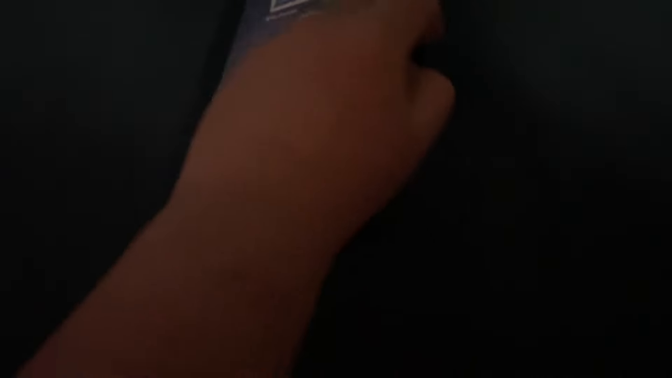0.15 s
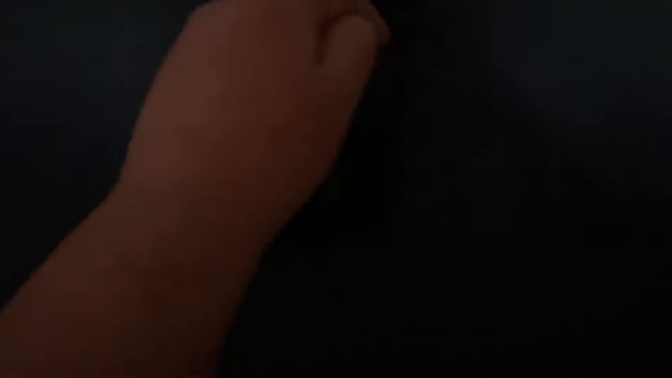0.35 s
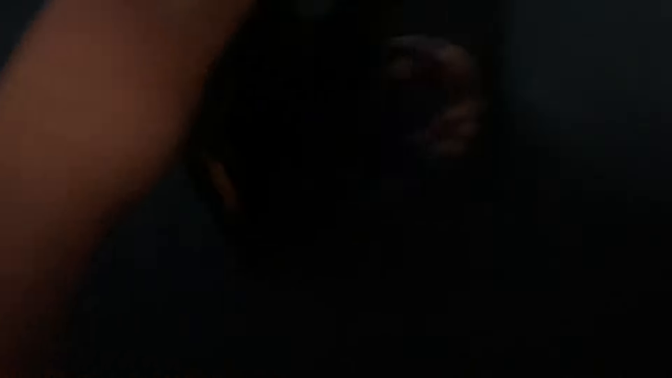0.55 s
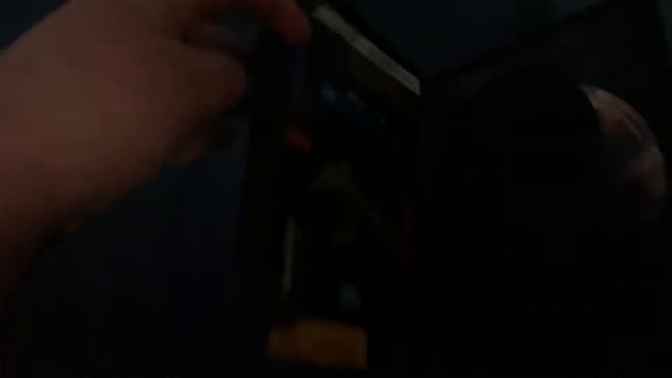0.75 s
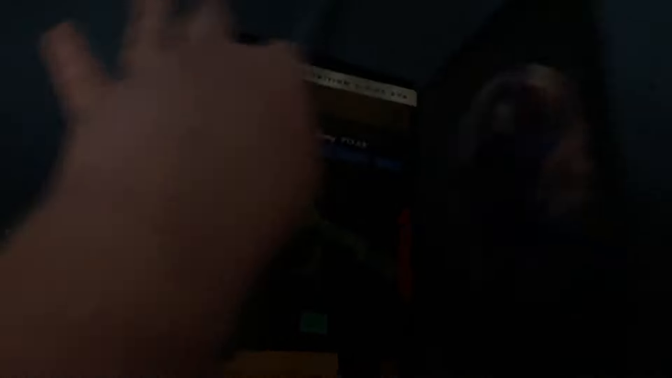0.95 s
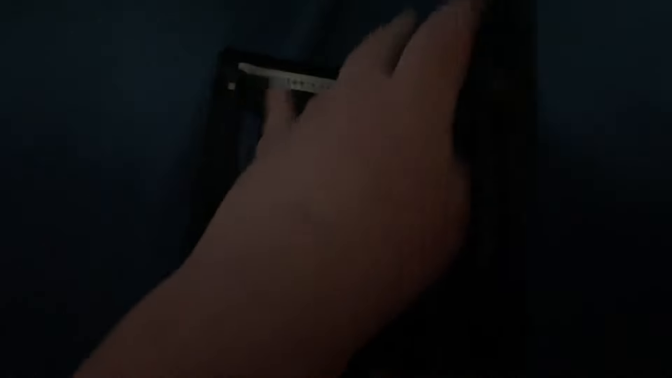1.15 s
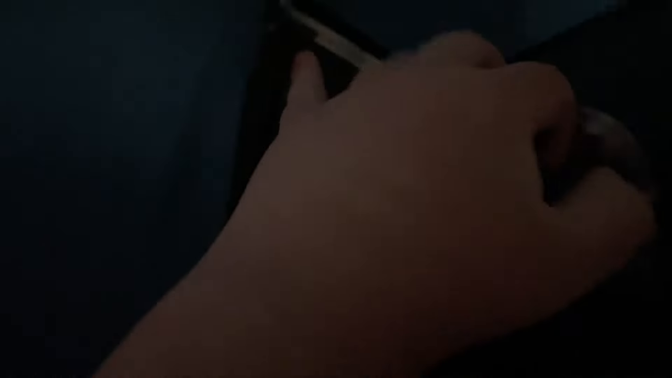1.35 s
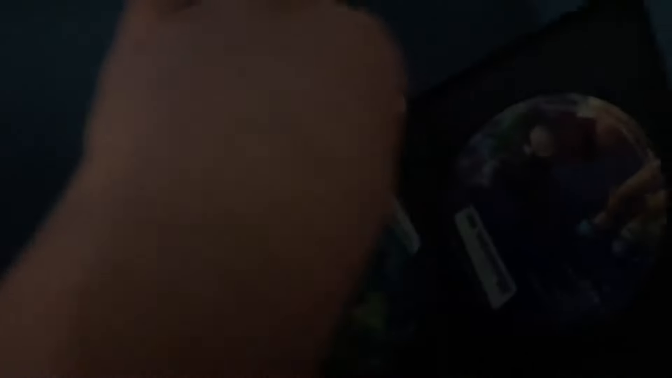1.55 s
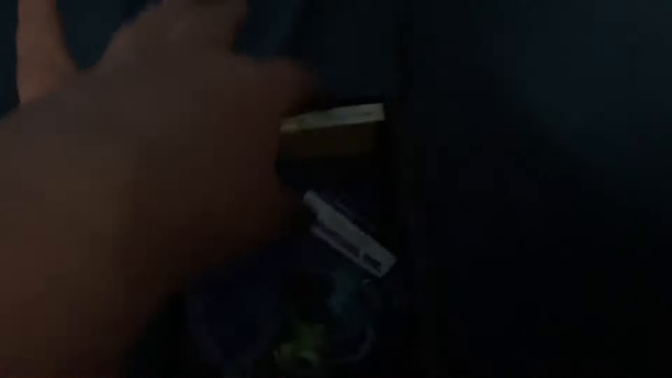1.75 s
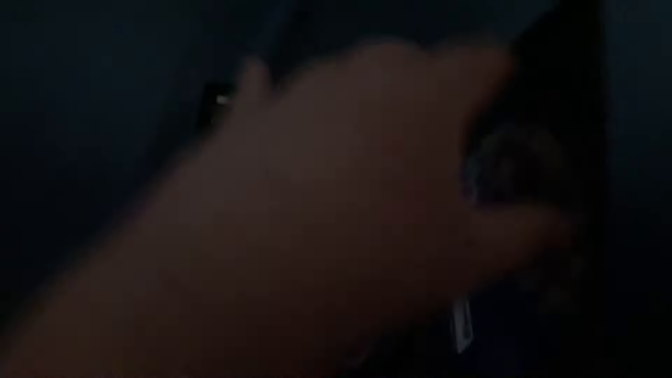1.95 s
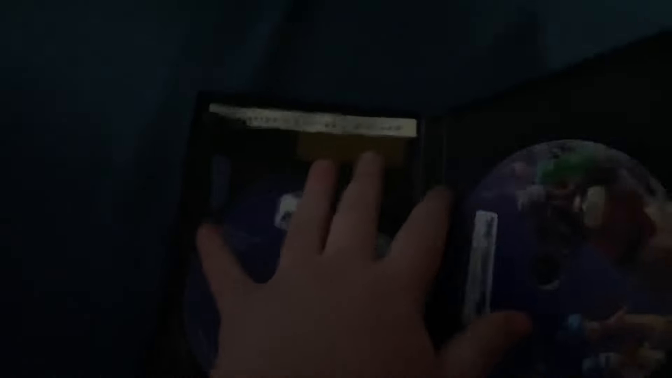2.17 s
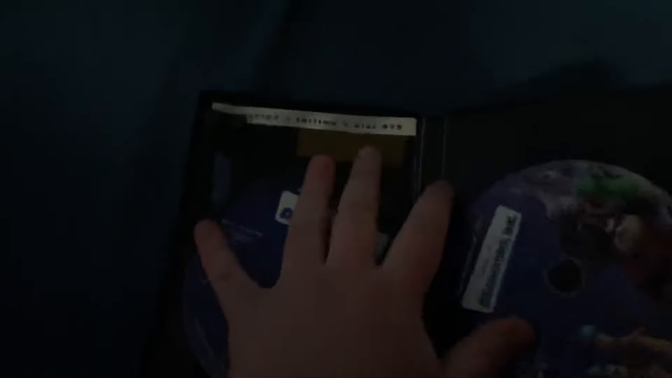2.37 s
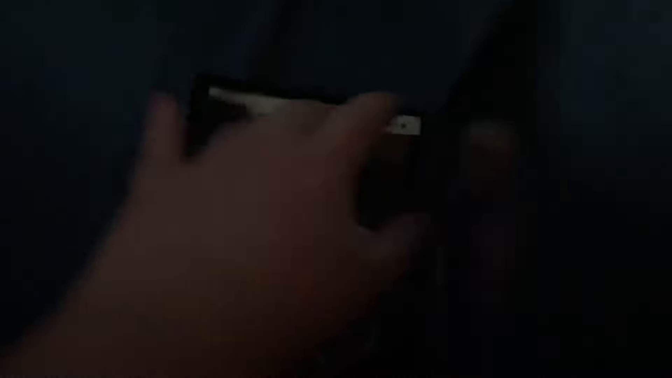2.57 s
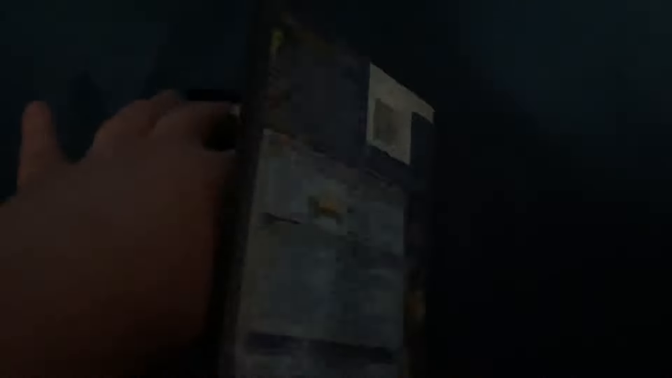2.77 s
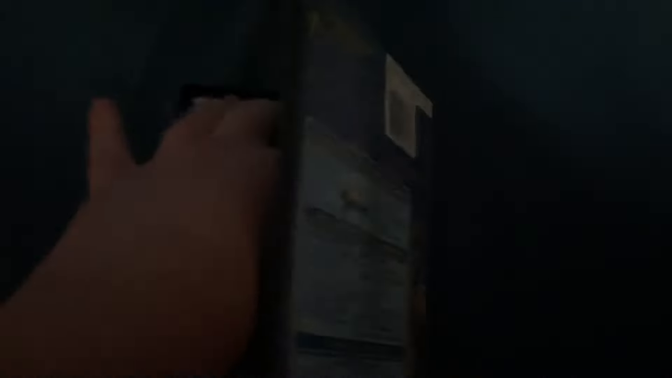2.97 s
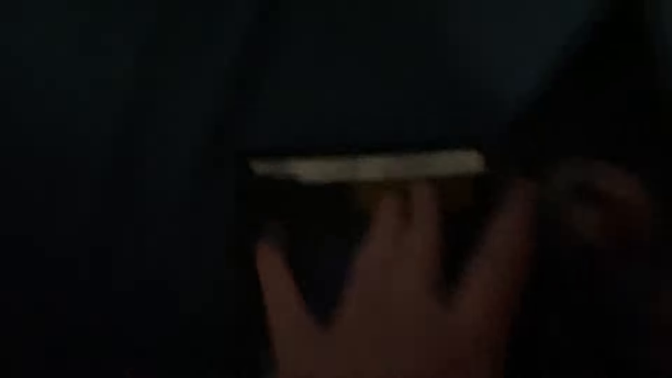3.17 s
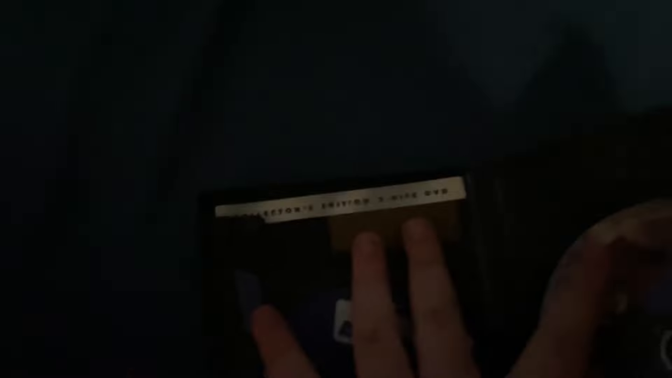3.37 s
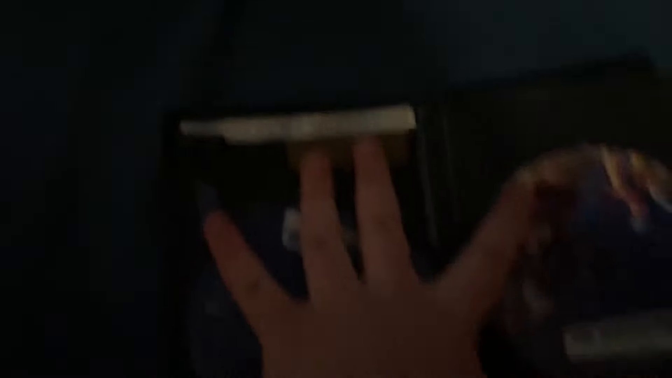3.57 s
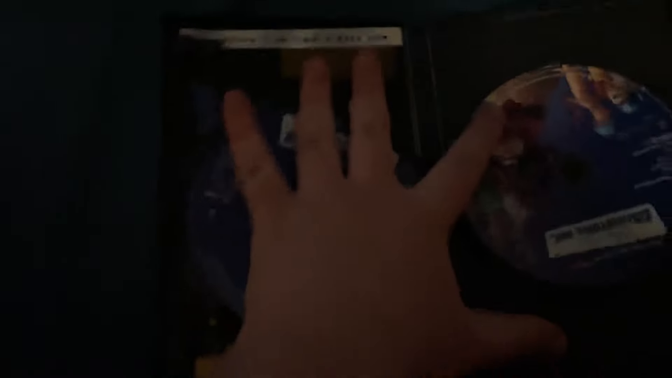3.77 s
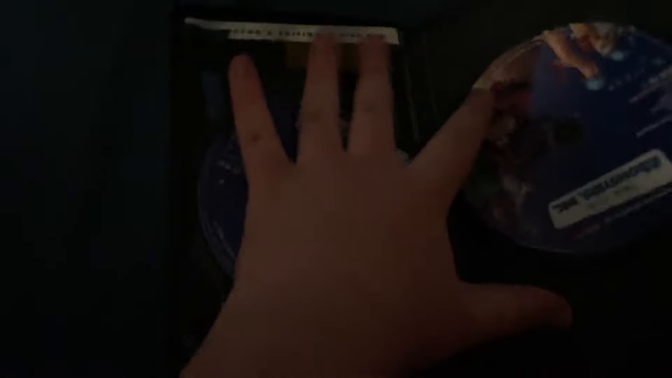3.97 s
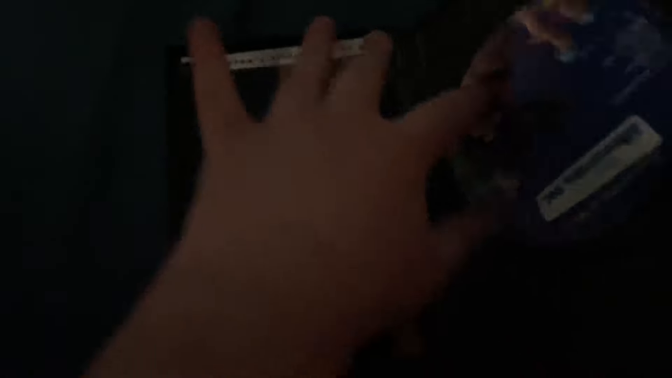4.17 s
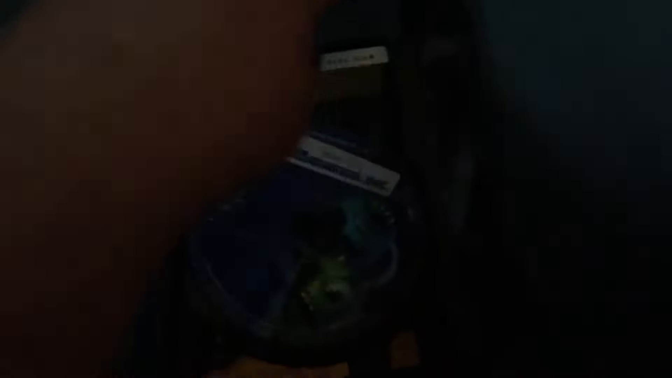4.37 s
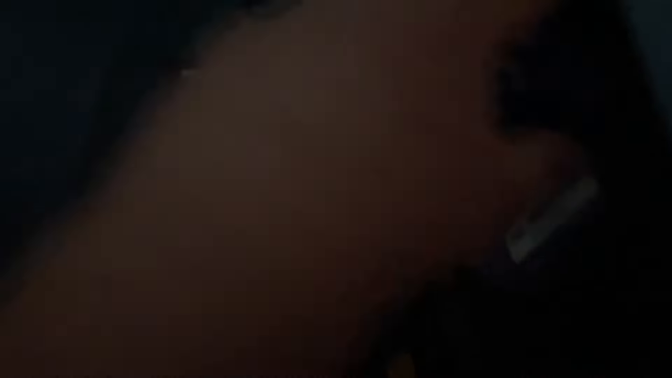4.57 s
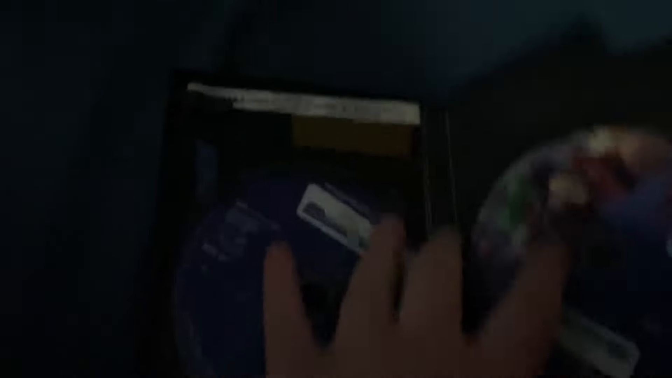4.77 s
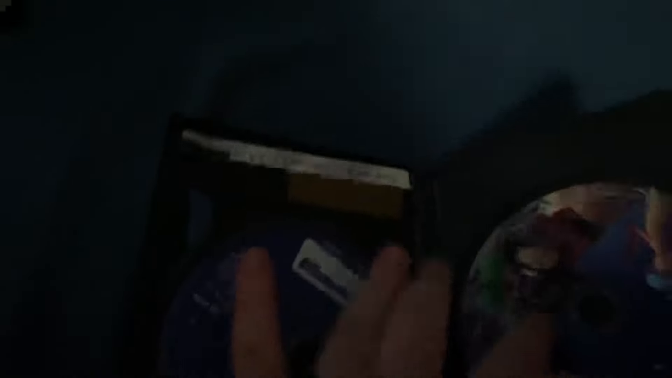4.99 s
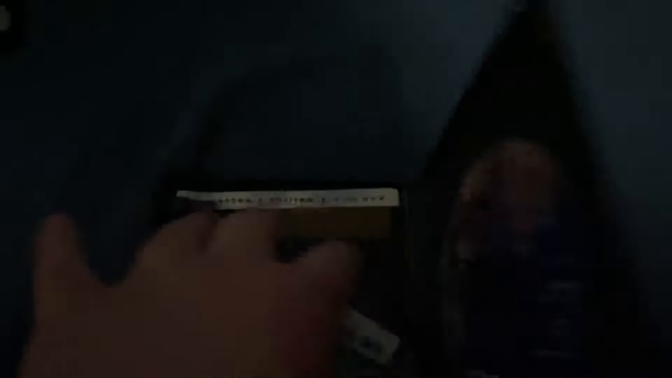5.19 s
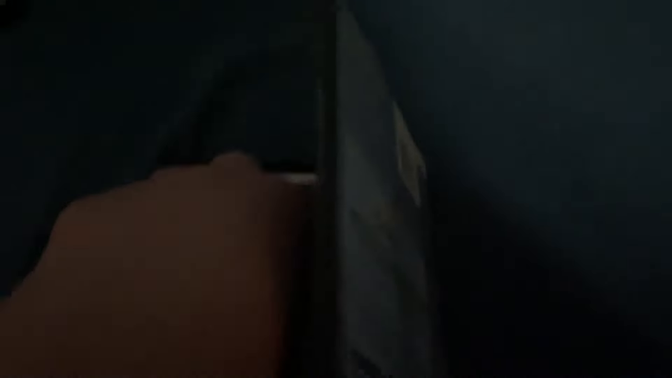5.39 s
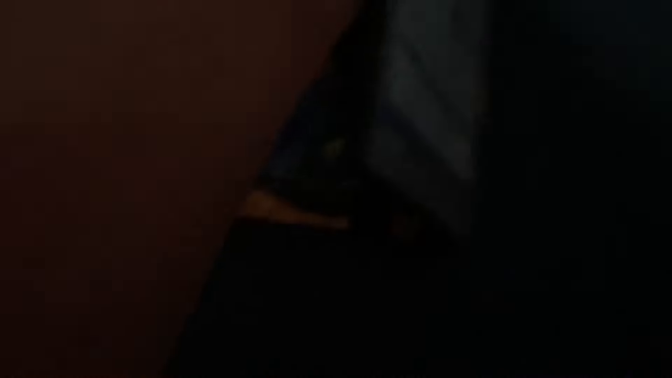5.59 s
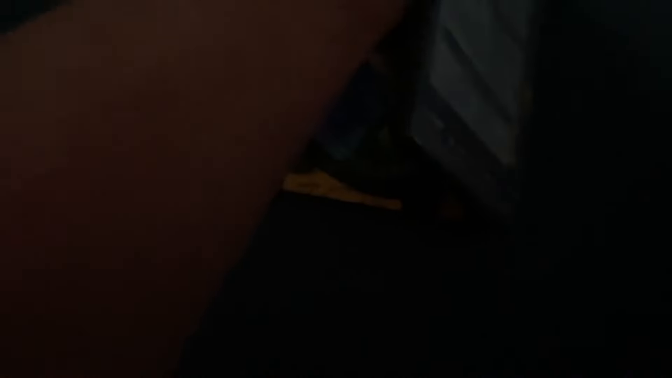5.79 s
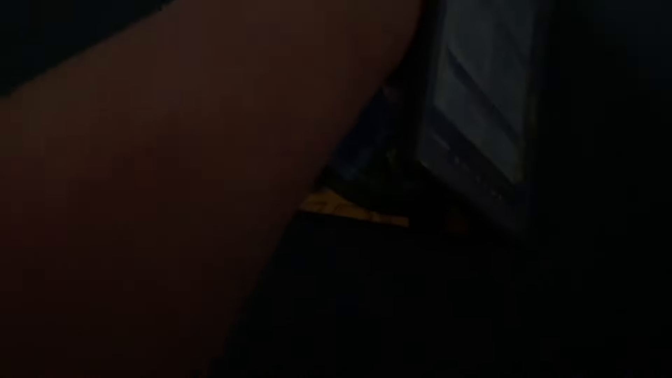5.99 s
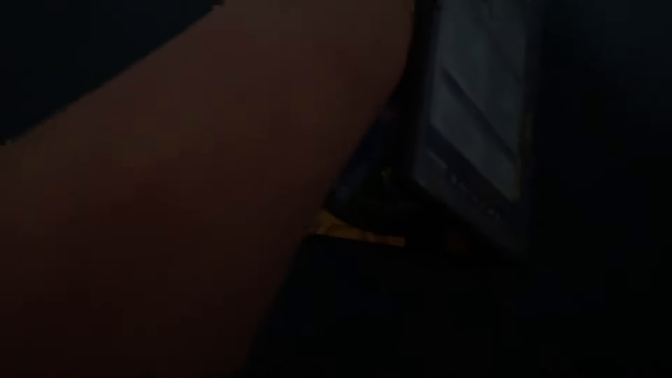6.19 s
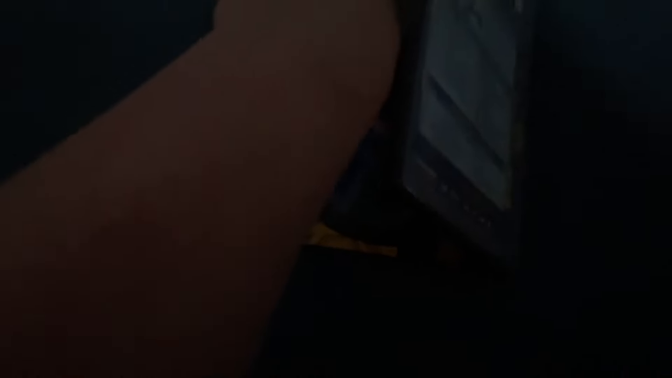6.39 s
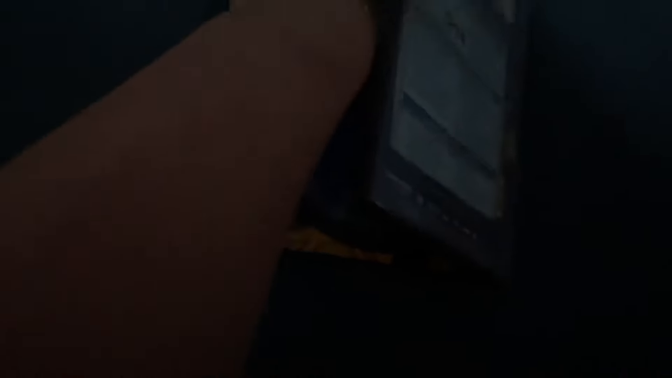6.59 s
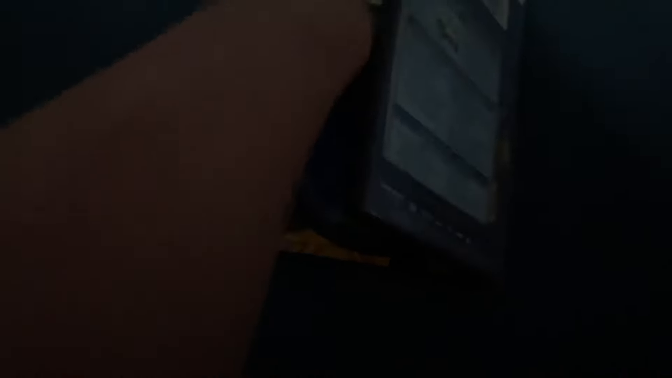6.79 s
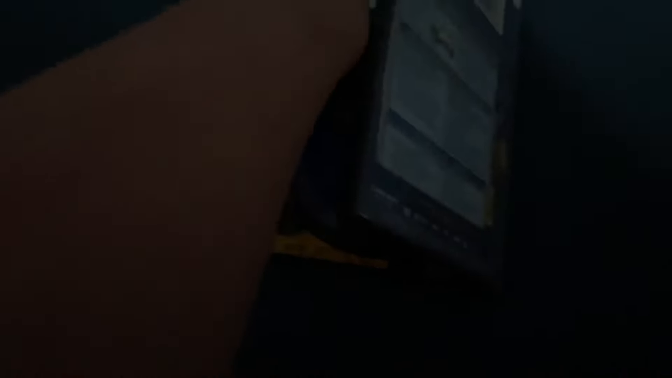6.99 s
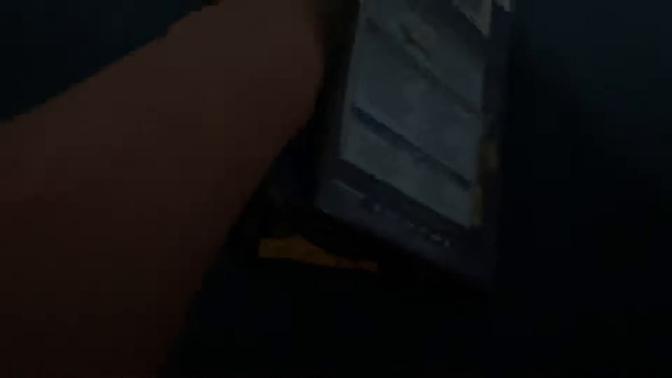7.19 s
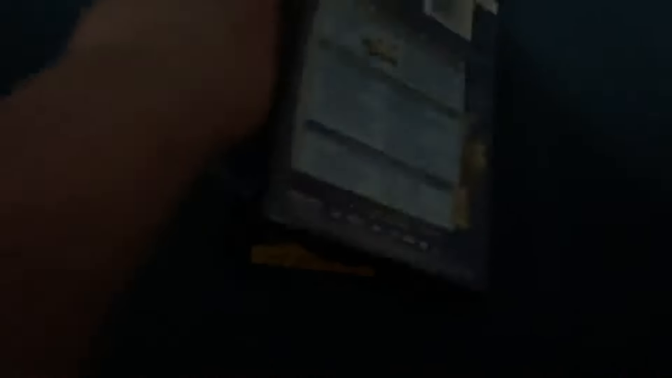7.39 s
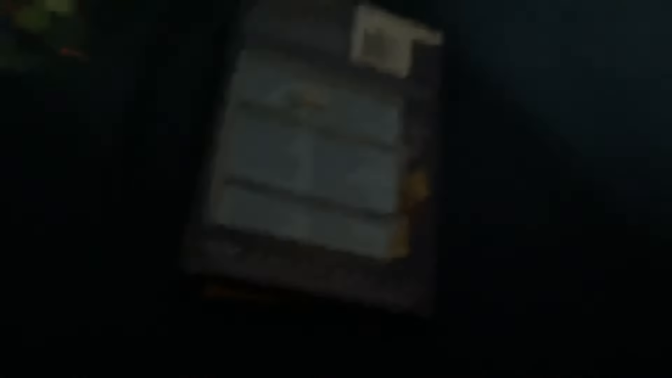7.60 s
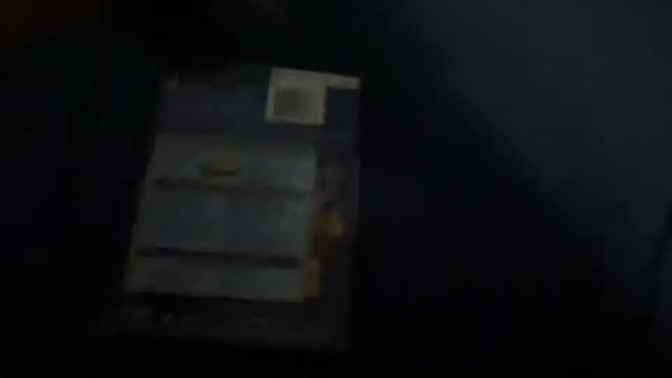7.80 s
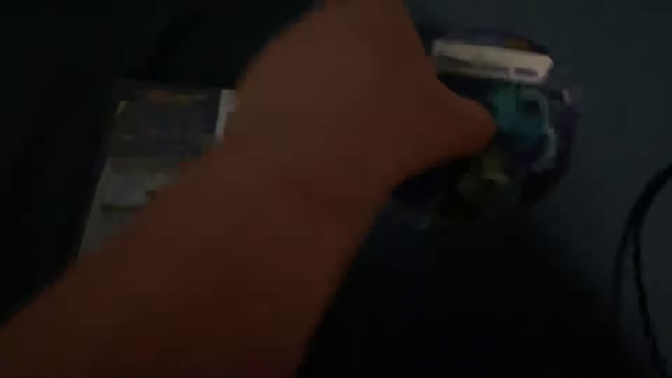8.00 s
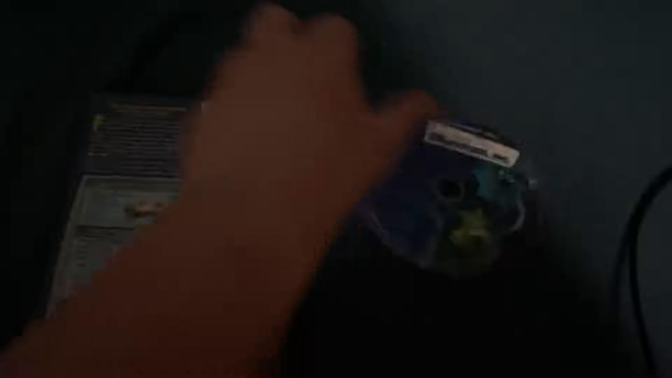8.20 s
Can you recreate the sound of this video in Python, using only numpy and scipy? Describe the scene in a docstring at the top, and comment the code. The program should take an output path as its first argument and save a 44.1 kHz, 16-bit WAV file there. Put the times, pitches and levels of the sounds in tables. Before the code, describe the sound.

Brittle plastic catches crack and loose leaves buzz as a disc case is opened and turned over by hand. Skin and sleeve brush it, plastic scrapes in short strokes, and the case rustles and thuds dully on padding. Activity is dense for the first half, sparser later, until a hard snap frees the disc and soft bumps finish. The microphone is close, the room small and dry, with faint hiss and a thin high-pitched electronic whine.

```python
"""Opening a disc case

A hand opens a plastic disc case on a padded surface, flips its leaves and pops a disc off the hub.
Catches snap and loose plastic ticks: noise bursts excite the resonances of a thin shell.
Sliding plastic scrapes as modulated noise; soft bumps on the padding are short tones of falling pitch.
Skin and sleeve brush the case and the case drags on the padding, both as shaped noise.
The room is small and dry, with a faint hiss and the thin whine of a picture tube."""
import sys
import numpy as np
from scipy import signal
from scipy.fft import rfft, irfft, next_fast_len
from scipy.io import wavfile
from scipy.ndimage import uniform_filter1d

SR = 44100
rng = np.random.default_rng(int(sys.argv[2]) if len(sys.argv) > 2 else 0)


def store_wav(level_fs):
    """Save 16-bit WAV to argv[1]."""
    pcm = np.round(np.clip(np.atleast_2d(level_fs), -1, 1) * 32767)
    wavfile.write(sys.argv[1], SR, pcm.T.astype(np.int16))


N = 363825  # samples

# plastic striking plastic: t/s, build-up/s, presence-band level over 10 ms before the trim/dB,
# then knock/dB, hollow/dB and edge/dB relative to presence, ring f/Hz, left-right difference/dB
CLICKS = [(0.0424, 0.00075, -41.5, -26, 3, -3, 900, 1.5), (0.337, 0.00092, -30.5, 3, 1.5, -1, 4260, 7),
          (0.341, 0.00092, -17.5, -3, -2.5, -11, 1870, -3), (0.5951, 0.001, -45, -11, -6, 4.5, 5230, 5),
          (0.749, 0.0015, -49.5, 6, -11, -18, 1750, 0), (0.779, 0.0015, -41, -27, -4, -7, 4100, 4),
          (0.8293, 0.00066, -53.5, 0, 0, -6, 1420, -3), (1.0105, 0.0025, -25.5, -9.5, -3, -3.5, 1300, 3),
          (1.03, .0029, -46.5, 5, -4, -13, 3700, 11), (1.0529, .0017, -15.5, -14, -8, -2.5, 2540, 2),
          (1.257, 0.0017, -49, -12, -9, -12, 1640, 6), (1.4557, 0.0039, -41.5, -13, -0.5, -5.5, 1750, 0),
          (1.5902, 0.0016, -50, -26.5, -5, -5.5, 3020, 3.5), (1.7968, 0.0019, -45, 13, 3, 1, 694, 4.5),
          (1.81, 0.00076, -37.5, -1, -13, 3, 3200, -6.5), (1.8196, 0.00085, -40, -2, -6, 3, 736, 14),
          (1.8291, 0.0037, -33.5, -3, -1.5, -2.5, 740, -1), (1.8516, 0.002, -42, -1, -4, -2, 2700, 9),
          (1.983, 0.0011, -38, -12, -8, 0.5, 5370, 2.5), (2.0187, .002, -50.5, -3, -4, -30, 3360, 7),
          (2.0878, 0.0021, -44, -9, -3.5, -11, 3090, 6), (2.095, 0.003, -43.5, 0, -7, -8.5, 3270, 5),
          (2.2097, 0.0026, -37, -12.5, -14.5, -11.5, 3430, 0.5), (2.3364, .004, -66, 13, 14, -1, 710, 1),
          (2.4326, 0.0078, -48, -4, -1.5, -12.5, 2290, 1.5), (2.484, 0.0011, -53, -19, -1.5, -16, 920, 2),
          (2.6587, 0.0024, -61, 18, -5, 9, 3570, 5), (2.6691, 0.00083, -57, 1, 8.5, 5, 1060, 4),
          (3.0089, 0.0011, -34, -7, -4.5, -1, 4060, 1.5), (3.261, 0.0013, -49.5, 3, 0, -20, 3200, 5),
          (3.3223, 0.00074, -29.5, -5, -1, -1, 3200, 4), (3.468, 0.00081, -28.5, -14, -0.5, -6, 1020, -0.5),
          (3.4883, 0.0011, -52.5, 9, 5, -16, 3050, 1), (3.5454, 0.0004, -39.5, -6, -11.5, -2, 2620, -0.5),
          (3.888, .001, -53.5, -18, -10, -2, 4000, -3.5), (3.9324, 0.0013, -59.5, -16, -3, -7.5, 3060, 8.5),
          (4.1579, 0.0018, -43, -11, -10, -19, 3240, 7.5), (4.2823, .0017, -68, -0.5, 8.5, -13, 740, 11),
          (4.376, .0006, -65.5, 7.5, -5, 2.5, 4180, 7.5),
          (4.6278, 0.0029, -35.5, -17.5, -12, -7, 3220, 1.5),
          (4.7429, 0.0025, -40.5, -14, -32, -3, 3100, 1.5), (4.8323, .0026, -51, -25, -5.5, -10, 1960, 0.5),
          (5.1494, 0.00072, -55.5, -13, -4.5, -3.5, 2490, 10), (5.2791, 0.0017, -48, -2, -8, -7.5, 3570, 6),
          (5.4773, 0.0033, -44, -5, -9, -4, 3180, 3), (6.633, 0.0012, -57, 4.5, -3, -8, 2820, 1),
          (6.6981, 0.00098, -39.5, -2, -8.5, -5.5, 2480, 4.5),
          (6.8838, 0.0014, -21.5, -5.5, -10, 1.5, 2880, 0),
          (6.8867, 0.0013, -19.5, -5, -14, -0.5, 2280, 2.5), (7.166, 0.0025, -68.5, 2.5, -4, 1, 1190, 2),
          (7.2271, 0.0019, -46.5, 2.5, -19, -11.5, 2280, 4.5),
          (7.4914, 0.00059, -49.5, -0.5, -14.5, 11, 4830, 0.5),
          (7.494, .0013, -41.5, -10, 4.5, 6.5, 990, 4), (7.5244, 0.001, -40, -18, -16, -22.5, 1890, -8),
          (7.5305, 0.0013, -38.5, -22, -8.5, -15, 3940, 5), (7.538, 0.0012, -49, -4, -19, 2, 3920, -9),
          (7.259, 0.0016, -59, 0, 6, -15, 2650, 1.5), (8.0845, 0.002, -59.5, 4.5, -8, 0.5, 980, 0)]
# soft bumps on the padding: t/s, peak level before the trim/dB, reference f/Hz, build-up/s
BUMPS = [(0.021, -51, 218, 0.016), (0.3417, -18.5, 139.2, 0.009), (0.748, -28.5, 77, 0.014),
         (1.012, -36, 200, 0.0089), (1.441, -39, 65.5, 0.01), (1.781, -24, 147.4, 0.0061),
         (1.799, -23.5, 152, 0.0053), (1.814, -22.5, 58, 0.0098), (1.99, -39.5, 120, 0.0079),
         (2.216, -42, 144, 0.0078), (2.336, -44, 155, 0.0061), (2.5, -30.5, 73, 0.01),
         (2.545, -35, 77.7, 0.0222), (2.615, -30.5, 58, 0.017), (2.66, -32.5, 82.4, 0.017),
         (3.016, -43.5, 142, 0.0068), (3.243, -33.5, 225, 0.0077), (3.325, -30, 159, 0.013),
         (3.369, -38, 63, 0.01), (3.47, -34.5, 138, 0.011), (3.926, -54, 120.3, 0.012),
         (4.158, -46, 59.6, 0.01), (4.528, -54, 80.3, 0.0077), (4.636, -41, 67, 0.0074),
         (4.736, -39, 139, 0.012), (4.845, -43, 154, 0.0062), (5.124, -31.5, 59.1, 0.013),
         (5.31, -36.5, 121.6, 0.0047), (5.631, -35.5, 72, 0.017), (5.933, -48, 165, 0.011),
         (6.035, -54.5, 111.1, 0.011), (6.203, -43.5, 186.4, 0.0067), (6.234, -40, 81, 0.0093),
         (6.546, -40, 191, 0.0052), (6.699, -45, 183, 0.009), (6.886, -23.5, 165, 0.0043),
         (7.222, -44.5, 169.7, 0.011), (7.5, -45, 90, 0.017), (7.924, -53, 169, 0.0088),
         (8.164, -22, 108.7, 0.0096), (8.227, -25, 88, 0.0067)]
# friction of skin and sleeve on the case: t/s, rub level/dB, dull level/dB, fizz level before the trim/dB
BRUSH = [(0.0, -67, -53, -80), (0.16, -68.5, -108, -73), (0.37, -71, -71, -86), (0.53, -61.5, -75, -67),
         (0.99, -67, -85, -75), (1.28, -63.5, -77, -59), (1.58, -71.5, -87.5, -89.5),
         (1.81, -69.5, -83.5, -79.5), (2.0, -58.5, -71, -66.5), (2.27, -66, -67.5, -73.5),
         (2.66, -64, -64.5, -77), (3.01, -65, -80, -64), (3.38, -54, -55, -73), (3.54, -59.5, -59.5, -62.5),
         (3.7, -69, -74, -68.5), (4.0, -79, -81.5, -85.5), (4.37, -78.5, -89, -85), (4.66, -68, -82, -69),
         (4.8, -74, -66, -86), (4.99, -72, -74.5, -91), (5.4, -65, -70, -78), (5.88, -79, -86, -89.5),
         (7.05, -67, -79.5, -66), (7.63, -75, -82, -81), (8.09, -72, -73, -84.5), (8.25, -71.5, -64.5, -78)]
# knock, hollow, presence, edge and fizz bands: lower f/Hz, upper f/Hz
BANDS = [(180, 520), (540, 1450), (1700, 4200), (4200, 7500), (9000, 13200)]


def clicks(buzz_db=-19, buzz_s=.015, contact_db=5.5, graze_db=-24, ring_width_hz=560, ring_gain=6, trim_db=-1.5):
    """Impact: the edges graze, meet in a crowd of tiny contacts within a few ms, then the loose leaves buzz."""
    graze_s = .006
    # a harder contact lifts the fizz more than the edge
    fizz_db, fizz_slope = -7, 1.1
    out = np.zeros((2, N))
    t = np.arange(SR // 10) / SR - graze_s
    graze = gain_of(graze_db) * np.interp(t, [-graze_s, 0, graze_s], [0, 1, 0])
    for s, rise, db, knock, hollow, edge, ring_hz, pan_db in CLICKS:
        fizz = fizz_db + fizz_slope * edge
        u = np.maximum(t, 0) / max(rise, .0002)
        impact = u * np.exp(1 - u)
        buzz = gain_of(buzz_db) * (1 - np.exp(-u)) * np.exp(-t / buzz_s)
        force = graze + impact + buzz
        force = force * gain_of(contact_db * wander(len(t), per_s=3000))  # a few contacts dominate
        drive = ringing(force * rng.standard_normal((2, len(t))))
        sound = shell(drive, [knock, hollow, 0, edge, fizz], ring_hz, ring_width_hz, ring_gain)
        sound = sound * np.sqrt(.01 * SR)  # unit energy becomes unit rms over 10 ms
        add(out, s - graze_s, panned(sound, pan_db) * gain_of(db + trim_db))
    return out


def ticks(per_s=30, tick_db=1, spread_db=3, last_s=0.0027, low_hz=700, high_hz=4200, count=6):
    """Poisson-like impulses: loose plastic ticks at random while the hand rubs firmly."""
    # colour of a tick: knock/dB, hollow/dB, presence/dB, edge/dB, fizz/dB
    tick_colour = [-6, -3.5, 0, -5, -12.5]
    # ticking sets in between a light and a firm rubbing level
    light_db, firm_db = -72, -61
    t = np.arange(SR // 40) / SR
    out = 0
    effort = np.hypot(gain_of(follow(BRUSH, column=1)), gain_of(follow(BRUSH, column=2)))
    firmness = np.clip((20 * np.log10(effort) - light_db) / (firm_db - light_db), 0, 1)
    effort = effort * firmness
    for ring_hz in np.geomspace(low_hz, high_hz, count):
        contact = rng.standard_normal((2, len(t))) * np.exp(-t / last_s)
        tick = shell(contact, tick_colour, ring_hz, ring_width_hz=130, ring_gain=2.7)
        struck = rng.random(N) < per_s / count / SR
        train = struck * gain_of(spread_db * np.minimum(rng.exponential(1, N), 3))
        out = out + signal.oaconvolve((train * effort)[None], tick, axes=1)[:, :N]
    return out * gain_of(tick_db) * np.sqrt(SR / 100)  # level over 10 ms


def slides(slip_db=3, slips_per_s=450, ends_db=-15):
    """Stick-slip friction: plastic catches and yields at random under the envelope of each stroke."""
    # sliding strokes: start t/s, then crest t/s and end t/s (the earlier one is the crest), level/dB,
    # then knock/dB, hollow/dB, edge/dB and fizz/dB relative to presence, ring f/Hz, left-right difference/dB
    strokes = [(0.026, 0.032, 0.065, -64.5, 14, 14, -10, -22, 880, -1.5),
               (0.607, 0.626, 0.66, -64.5, 7.5, 11, 2, -8, 1020, 3),
               (0.652, 0.679, 0.7, -58.5, 1, 8, -5, -5, 655, 2),
               (0.691, 0.739, 0.82, -52, -4.5, 0, -5.5, -11.5, 2580, 1.5),
               (1.154, 1.169, 1.27, -59, -25, -31, -6, -2.5, 3470, 2),
               (1.421, 1.48, 1.38, -59.5, -7.5, -1, 1, -6, 4080, 0),
               (1.793, 1.823, 1.77, -45, -1.5, -0.5, -5, -11, 685, -1),
               (1.863, 1.899, 1.909, -49.5, 1.5, -2, -5.5, -3, 606, 0.5),
               (2.115, 2.144, 2.165, -51, -26, -3.5, -2, -15, 3160, 3),
               (2.613, 2.688, 2.64, -65, 6, 5.5, -5, -14, 790, 3),
               (2.77, 2.803, 2.936, -63.5, -0.5, -2, 8, 11, 3930, 1),
               (3.106, 3.139, 3.18, -47.5, -30, -20, -11.5, -18, 2800, 3),
               (3.19, 3.218, 3.21, -51.5, -6, -4, 1.5, -4.5, 5200, 7.5),
               (3.351, 3.399, 3.42, -44.5, -10, -5, 4.5, -5.5, 4600, -0.5),
               (4.436, 4.479, 4.515, -58.5, -11, -11.5, -2.5, 0, 3330, 3.5),
               (4.645, 4.688, 4.708, -40, -28, -16.5, -11.5, -16, 3520, 0),
               (4.706, 4.718, 4.742, -60.5, 5.5, 9.5, -17, -11, 2640, 4),
               (5.314, 5.362, 5.22, -54.5, 8, 2, -2.5, -4, 3260, -1),
               (7.375, 7.42, 5.4, -66, -6.5, -5, -3, 1, 3730, 4.5),
               (7.497, 7.526, 7.545, -42.5, -13.5, -9, 0, -9, 1910, 2.5)]
    out = np.zeros((2, N))
    for start, crest, end, db, knock, hollow, edge, fizz, ring_hz, pan_db in strokes:
        t = start + np.arange(SR // 5) / SR
        crest, end = np.sort([crest, end])
        stroke = gain_of(np.interp(t, [start, crest, end], [ends_db, 0, ends_db]))
        stroke *= np.interp(t, [start, start + 0.002, end, end + 0.0035], [0, 1, 1, 0])
        force = stroke * gain_of(slip_db * wander(len(t), slips_per_s))
        drive = force * patchy(pair(len(t), alike=0), depth_db=3.5, wide_hz=260, long_s=.03)
        sound = shell(drive, [knock, hollow, 0, edge, fizz], ring_hz, ring_width_hz=900, ring_gain=4)
        # unit energy becomes unit rms over the nominal stroke
        add(out, start, panned(sound, pan_db) * gain_of(db) * np.sqrt(abs(end - start) * SR))
    return band(out, 100, 13600, order=8)


def bumps(settled=.65, glide=1.6, glide_speed=1.5, rough=0.14, tail_db=-17, tail_s=0.015, push_db=-12, trim_db=-1):
    """Yielding contact: it spreads as the padding gives, so the pitch of each bump falls; then the case shudders."""
    out = np.zeros((2, N))
    t = np.arange(SR // 6) / SR
    ports = np.array([[.35], [-.35]])  # phase at the two microphones, rad
    for s, db, hz, rise in BUMPS:
        u = t / rise
        turns = np.cumsum(hz * (settled + glide * np.exp(-glide_speed * u))) / SR
        flutter = evened(band(pair(len(t), alike=0.95), 82, 300, order=3))
        # the near field differs at the two microphones
        swing = np.sin(2 * np.pi * turns + ports) + rough * flutter
        thump = (u * np.exp(1 - u)) ** 2 * (swing + gain_of(push_db))
        shudder = gain_of(tail_db) * (1 - np.exp(-u ** 2)) * np.exp(-t / tail_s) * flutter
        add(out, s, gain_of(db + trim_db) * (thump + shudder))
    return out


def disc():
    """Free plate modes: the lifted disc rings briefly in bending as decaying sinusoids."""
    # bending modes: f/Hz, level/dB, t60/s
    bending_modes = [(972, -53, 0.28), (2617, -65.5, 0.21)]
    lift_s = 8.086
    out = np.zeros((2, N))
    t = np.arange(SR // 4) / SR
    ring = sum(gain_of(db - 60 * t / t60) * np.sin(2 * np.pi * hz * t) for hz, db, t60 in bending_modes)
    add(out, lift_s, ring)
    return out


def brushing(grain_db=1.5, grains_per_s=250, snags_per_s=45, snag_size=0.52, fizz_db=-1,
             scuff_dull_db=-5, scuff_fizz_db=-8):
    """Light friction of the hand, dull or fizzy as the grip changes, snagging on ridges when firm."""
    # spectrum of the friction: f/Hz, relative density/dB
    brush_colour = [(240, -33), (400, -3.5), (589, -11), (781, -7), (1690, -17), (2250, -8), (2810, -11.5),
                    (5480, -13.5), (6960, -12.5), (8440, -22.5), (11900, -19.5), (14000, -38.5),
                    (15000, -56)]
    # the fingers scuff around each click, more at a loud one
    scuff_db, scuff_slope, scuff_lead_s, scuff_fade_s = -47, .45, .012, .09
    noise = patchy(coloured(pair(N, alike=0.15), brush_colour), depth_db=2.0, wide_hz=350, long_s=0.055)
    scuff_events = [(s, scuff_db + scuff_slope * db) for s, _, db, *_ in CLICKS]
    scuff = swells(scuff_events, scuff_lead_s, scuff_fade_s)
    level_db = follow(BRUSH, column=1)
    rub = evened(band(noise, BANDS[2][0], BANDS[3][1]))
    rub = rub * np.hypot(gain_of(level_db), scuff)
    dull = evened(band(noise, *BANDS[1]))
    dull = dull * np.hypot(gain_of(follow(BRUSH, column=2)), scuff * gain_of(scuff_dull_db))
    fizz = evened(band(noise, *BANDS[4], order=5))
    fizz = fizz * np.hypot(gain_of(follow(BRUSH, column=3) + fizz_db), scuff * gain_of(scuff_fizz_db))
    pressure = np.clip((level_db + 73.5) / 12, 0, 1)  # firm contact is gritty, light contact smooth
    snags = (rng.random(N) < snags_per_s / SR) * np.minimum(rng.exponential(1, N), 3)
    snags = signal.lfilter([1], [1, -np.exp(-1 / (0.0012 * SR))], snags)  # each dies with a 1.2 ms time constant
    grit = gain_of(grain_db * pressure * wander(N, grains_per_s))
    grain = evened(grit + snag_size * pressure * snags)
    return (dull + rub + fizz) * grain


def shifting(lump_db=3, lumps_per_s=45, trim_db=1):
    """Amplitude-modulated friction: a lumpy low rustle as the case drags on the padding and settles after bumps."""
    # drag of the case on the padding: t/s, level before the trim/dB
    drag_levels = [(0.0, -91), (0.37, -112), (0.5, -80), (0.6, -51.5), (1.03, -73), (1.45, -49),
                   (1.61, -68.5), (1.84, -76), (1.97, -54), (2.23, -56), (2.53, -47.5), (3.03, -63.5),
                   (3.45, -46.5), (3.65, -68), (4.23, -77.5), (4.62, -67), (5.14, -76), (5.31, -58),
                   (5.51, -59), (5.74, -74.5), (7.14, -64), (7.31, -71), (7.81, -75.5), (8.25, -65.5)]
    # spectrum of the rustle: f/Hz, relative density/dB
    shift_colour = [(15, -37), (25, -0.5), (65, 9), (167, -1), (205, -1.5), (334, -12), (424, -10.5),
                    (568, -28), (700, -23), (910, -46), (1540, -120)]
    # the case presses into the padding before each bump and settles after it
    settle_db, settle_slope, press_s, settle_s = -30, .65, .02, .06
    lumps = evened(gain_of(lump_db * wander(N, lumps_per_s)))
    noise = pair(N, alike=.5)
    settle_events = [(s, settle_db + settle_slope * db) for s, db, *_ in BUMPS]
    settling = swells(settle_events, press_s, settle_s)
    drag = gain_of(follow(drag_levels, column=1) + trim_db)
    return coloured(noise, shift_colour) * lumps * np.hypot(drag, settling)


def shell(drive, colour_db, ring_hz, ring_width_hz, ring_gain):
    """Resonance: contact noise rings the thin shell; each band carries unit energy times its colour."""
    shared, apart = drive
    r = np.exp(-np.pi * ring_width_hz / SR)
    pole = r * np.exp(2j * np.pi * ring_hz / SR)
    out = 0
    # the microphones differ by a set amount in each band, least in the fizz
    for (lo, hi), db, spread in zip(BANDS, colour_db, [0.93, 0.86, 0.9, 0.86, 0.63]):
        both = np.array([shared + spread * apart, shared - spread * apart])
        ring = signal.lfilter([1 - r], [1, -pole], both).real
        part = band(both + ring_gain * ring, lo, hi)
        out = out + gain_of(db) * part / np.sqrt(np.sum(part ** 2) / 2 + 1e-24)
    return out


def ringing(drive, ring_db=-4, spot_db=2.5, flex=0.0066):
    """Modal excitation: mode strength changes with the spot struck, pitch as the case flexes."""
    # modes of the thin shell, rung by every click: f/Hz, mean level before ring_db/dB, t60/s
    shell_modes = [(742.6, -41, 0.11), (1018, -40, 0.06), (1298, -43.5, 0.037), (1358, -45, .11),
                   (1835, -39, .05), (2230, -40.5, .06), (2540, -40, 0.063), (2807, -41, 0.045),
                   (3156, -43.5, 0.14), (4550, -42, .06), (4970, -44, .06), (5750, -43.5, .07)]
    t = np.arange(drive.shape[1]) / SR
    chance = rng.standard_normal((len(shell_modes), 2))
    modes = 0
    for (hz, db, t60), (spot, bend) in zip(shell_modes, chance):
        decay = gain_of(db + spot_db * spot - 60 * t / t60)
        modes = modes + decay * np.cos(2 * np.pi * hz * (1 + flex * bend) * t)
    return drive + gain_of(ring_db) * signal.fftconvolve(drive, modes[None], axes=1)[:, :len(t)]


def patchy(x, depth_db, wide_hz, long_s):
    """Time-varying resonance: the contact point wanders, so different resonances of the case come and go."""
    z = signal.stft(x, SR, nperseg=512, noverlap=384)[2]
    patches = rng.standard_normal(z.shape[1:])
    patches = uniform_filter1d(patches, max(round(wide_hz * 512 / SR), 1), axis=0)
    patches = uniform_filter1d(patches, max(round(long_s * SR / 128), 1), axis=1)
    z = z * gain_of(depth_db * evened(patches))
    return signal.istft(z, SR, nperseg=512, noverlap=384)[1][:, :x.shape[1]]


def swells(events, rise_s, fade_s):
    """Energy summation of events (t/s, level/dB) that each swell exponentially to their moment, then fade."""
    t = np.arange(0, N, 64) / SR
    s, db = np.transpose(events)[:, :, None]
    each = gain_of(db) * np.exp(-np.maximum((s - t) / rise_s, (t - s) / fade_s))
    return np.interp(np.arange(N) / SR, t, np.linalg.norm(each, axis=0))


def gain_of(db):
    """Logarithmic level: decibels to amplitude gain."""
    return 10 ** (np.asarray(db) / 20)


def evened(x):
    """Normalisation to rms 1."""
    return x / np.sqrt(np.mean(x ** 2) + 1e-24)


def read(points, hz):
    """Interpolation of a spectrum on a log-frequency axis."""
    f, value = np.transpose(points)
    return np.interp(np.log(hz + 1), np.log(f + 1), value)


def follow(rows, column):
    """Linear interpolation of one column of a curve at every sample."""
    rows = np.asarray(rows)
    return np.interp(np.arange(N) / SR, rows[:, 0], rows[:, column])


def add(mix, s, sound):
    """Superposition: mixes a sound into a stereo mix at time s."""
    part = mix[:, max(round(s * SR), 0):][:, :sound.shape[-1]]
    part += sound[..., :part.shape[1]]


def band(x, lo, hi, order=3):
    """Causal band-pass filtering."""
    return signal.sosfilt(signal.butter(order, [lo, hi], "band", fs=SR, output="sos"), x)


def pair(count, alike):
    """Partial coherence: white noise for two microphones with a given correlation."""
    a, b = rng.standard_normal((2, count))
    alike = np.clip(alike, -1, 1)
    return np.array([a, alike * a + np.sqrt(1 - alike ** 2) * b])


def coloured(x, points):
    """Spectral shaping: gives steady noise a spectrum, at rms 1."""
    size = next_fast_len(N)
    gains = gain_of(read(points, np.fft.rfftfreq(size, 1 / SR)))
    return evened(irfft(rfft(x, size) * gains, size)[:, :N])


def wander(count, per_s):
    """Random modulation at a chosen rate: straight lines between unit-normal knots."""
    knots = np.arange(count) * per_s / SR
    return np.interp(knots, np.arange(N // 8), rng.standard_normal(N // 8))


def panned(x, pan_db):
    """Interchannel level difference: leans a stereo sound left or right."""
    return x * gain_of([[pan_db / 2], [-pan_db / 2]])


def room(x, first_s=0.0033, wet_db=-9, bass_hz=450, least_hz=220):
    """Reverberation: dense early reflections that die quickly, alike at both microphones in the bass."""
    # decay of the room: f/Hz, t60/s
    room_decay = [(100, 0.61), (400, 0.077), (1000, 0.095), (3000, 0.15), (7000, 0.13), (13000, 0.16)]
    count = SR // 2
    taps = rng.choice([-1., 1.], (2, count)) * (rng.random((2, count)) < 4000 / SR)  # 4000 reflections per s
    hz, t, z = signal.stft(taps, SR, nperseg=256)
    alike = (1 / (1 + (hz / bass_hz) ** 4))[:, None]
    z = np.array([z[0], alike * z[0] + np.sqrt(1 - alike ** 2) * z[1]])
    decay = gain_of(-60 * t / read(room_decay, hz)[:, None])
    tail = signal.istft(z * decay, SR, nperseg=256)[1]
    tail = tail * (np.arange(tail.shape[1]) / SR > first_s)
    # a small case radiates little bass
    sent = signal.sosfilt(signal.butter(2, least_hz, "high", fs=SR, output="sos"), x)
    wet = signal.fftconvolve(sent, tail / np.linalg.norm(tail[0]), axes=1)[:, :N]
    return x + gain_of(wet_db) * wet


def background(steady=2.2, waver_db=3.0, wavers_per_s=45, port_turn=2.2):
    """Hiss, and interference: a whine that wavers as the microphones move through its standing waves."""
    # whine of the picture tube: t/s, level/dB
    whine_levels = [(0, -59), (.8, -48.5), (1.7, -60.5), (2.2, -59), (2.8, -63), (4.2, -61.5), (5.7, -52.5),
                    (6.2, -57), (7.2, -59.5), (8.25, -56.5)]
    # spectrum of the hiss: f/Hz, relative density/dB
    hiss_colour = [(18, -33), (30, -10.5), (373, 0.5), (941, -19.5), (1350, -6), (1880, -14), (3490, -5.5),
                   (5270, -19.5), (9280, -7.5), (14000, -28), (15000, -43.5)]
    whine_hz, hiss_db = 15735, -81
    turn = np.exp(2j * np.pi * whine_hz * np.arange(N) / SR)
    # a steady wave plus random reflections at each microphone
    paths = [steady * np.exp(1j * lag) + wander(N, wavers_per_s) + 1j * wander(N, wavers_per_s)
             for lag in (0, port_turn)]
    whine = evened((turn * np.array(paths)).real * gain_of(waver_db * wander(N, wavers_per_s)))
    hiss = coloured(pair(N, alike=0.048), hiss_colour)
    return gain_of(follow(whine_levels, column=1)) * whine + gain_of(hiss_db) * hiss


def scene():
    """Superposition: impacts, slides and disc excite the room; friction and background are added dry."""
    return room(clicks() + ticks() + slides() + bumps() + disc()) + brushing() + shifting() + background()


def record(dry):
    """Band limiting: the microphones drop the lowest bass, peaks stop at full scale, then the treble is cut."""
    edge_hz = 16600
    thinned = signal.sosfilt(signal.butter(4, 38, "high", fs=SR, output="sos"), dry)
    low_pass = signal.firwin(511, edge_hz, window=("kaiser", 9), fs=SR)
    return signal.oaconvolve(np.clip(thinned, -1, 1), low_pass[None], "same", axes=1)


dry = scene()
out = record(dry)
store_wav(out)
```